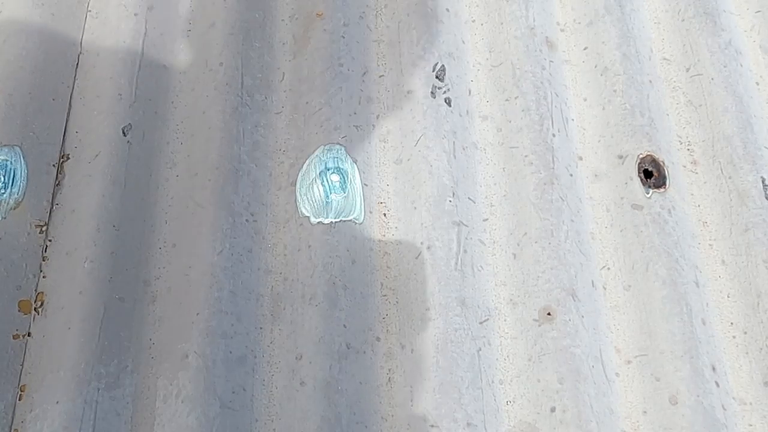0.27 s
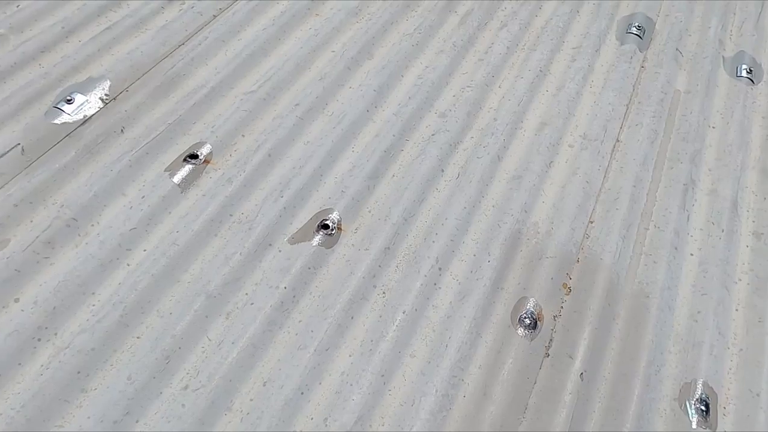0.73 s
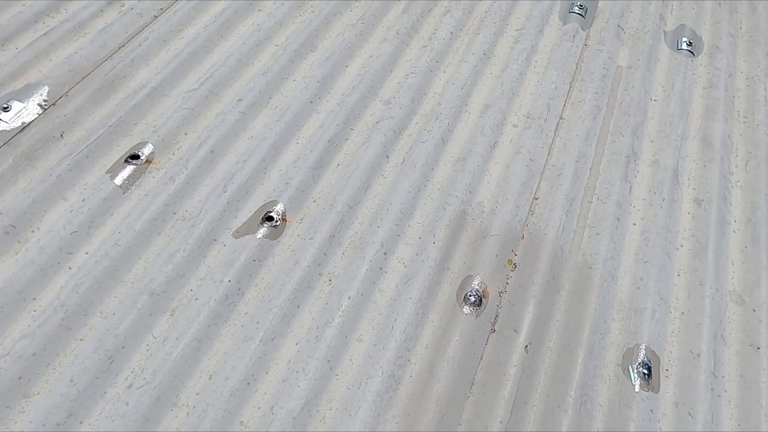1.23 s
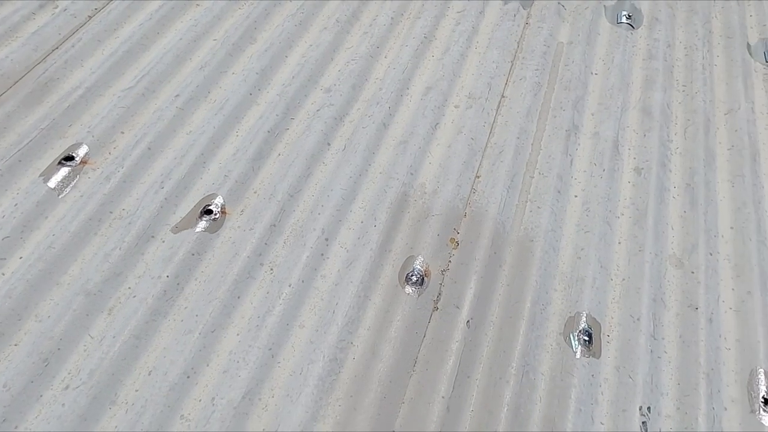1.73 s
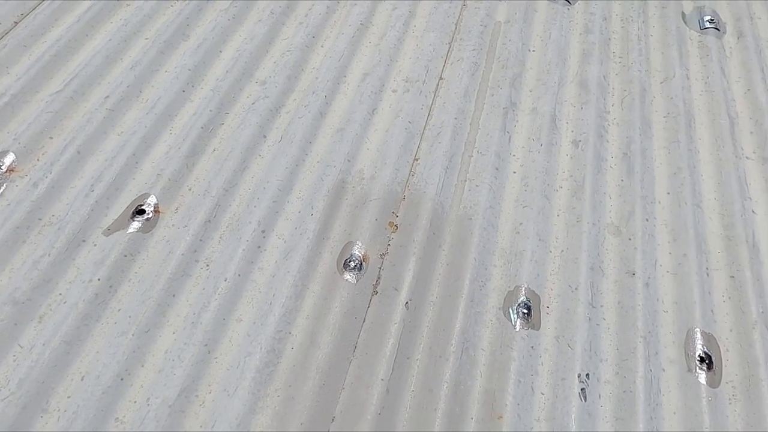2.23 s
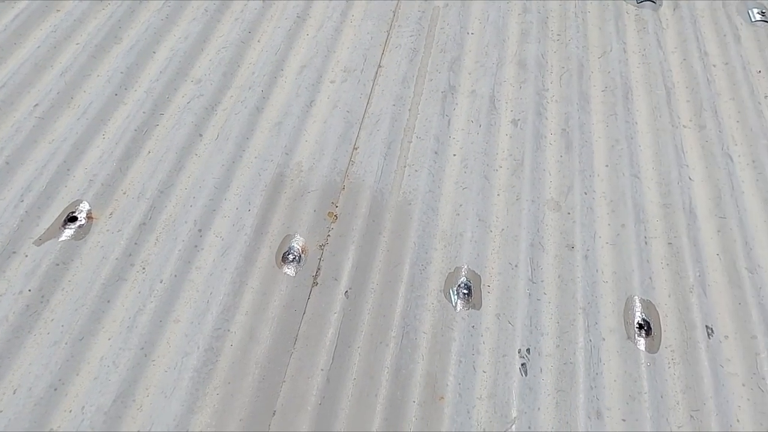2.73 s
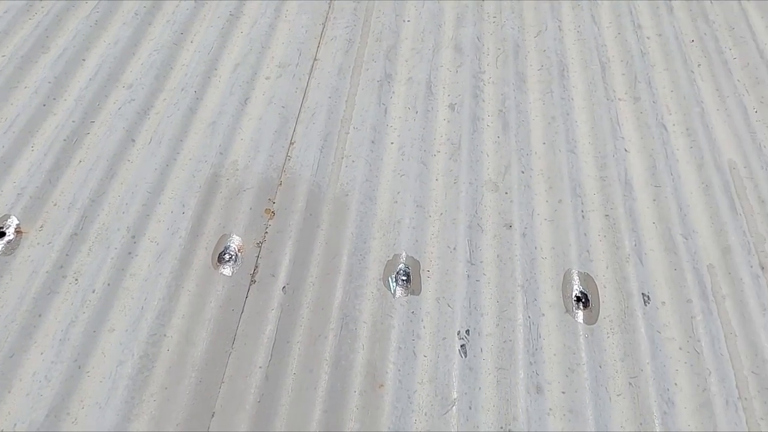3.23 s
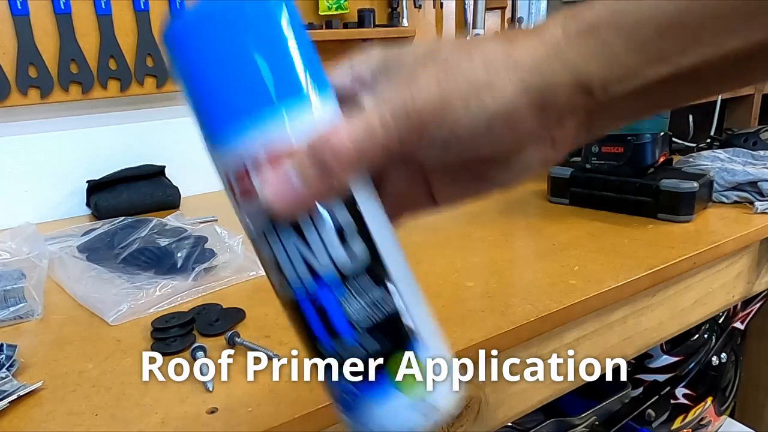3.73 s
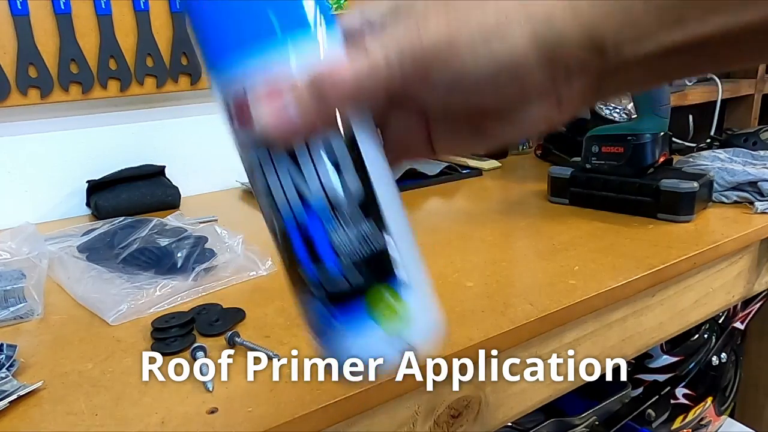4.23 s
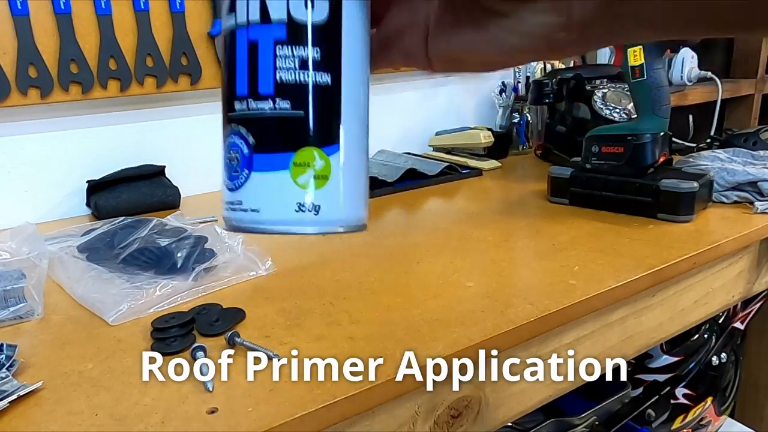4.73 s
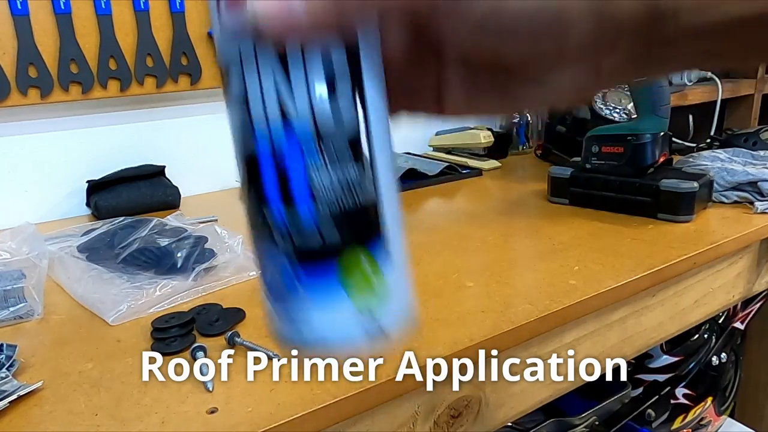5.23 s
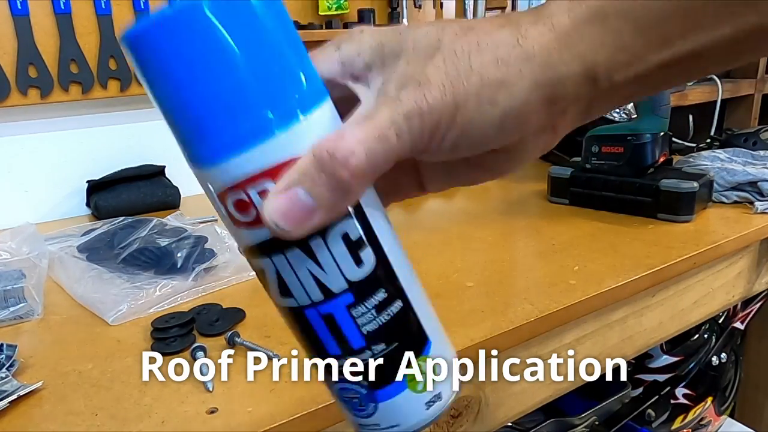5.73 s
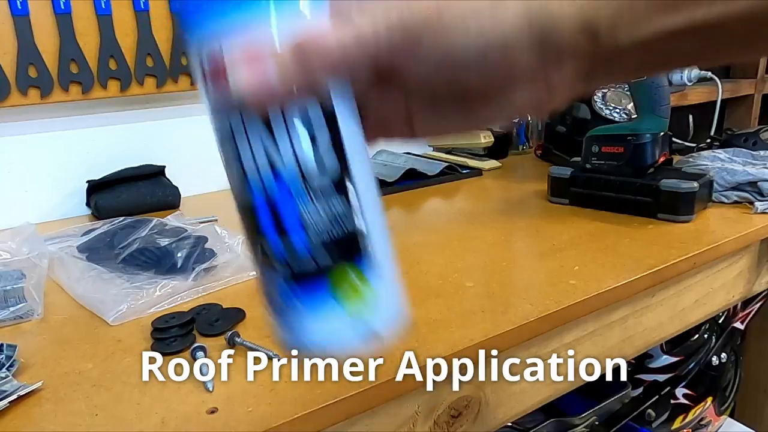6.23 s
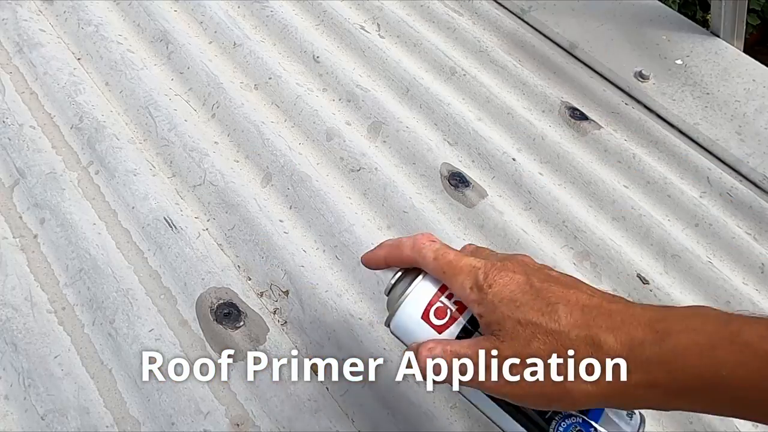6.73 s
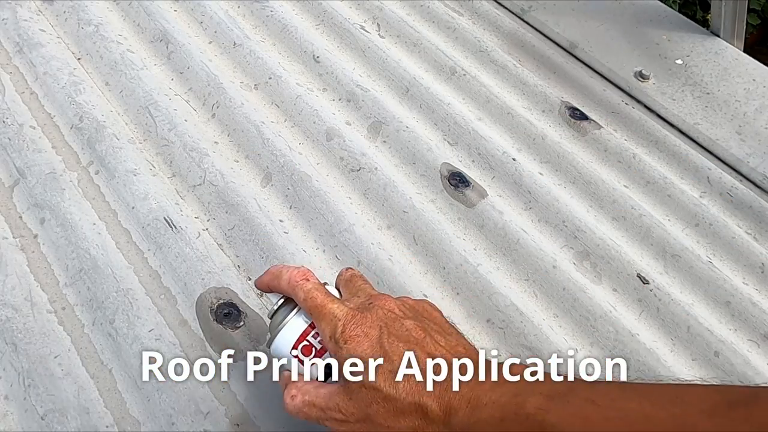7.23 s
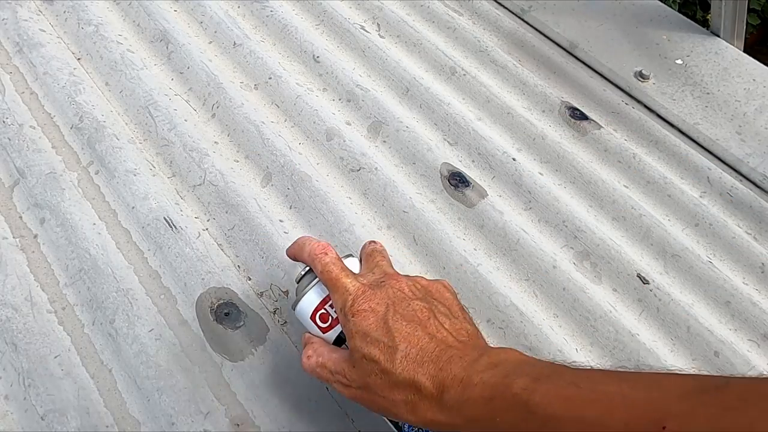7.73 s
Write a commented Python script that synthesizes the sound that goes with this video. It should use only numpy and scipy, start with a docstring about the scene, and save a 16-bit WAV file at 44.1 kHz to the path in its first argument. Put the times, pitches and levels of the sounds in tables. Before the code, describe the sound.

Outdoors on a metal roof, soft wind rumble, low hums and one thin falling bird call give way to a distant vehicle slowly growing louder. An abrupt cut to a quiet workshop: a spray can is shaken vigorously close to the microphone, its ball clacking brightly at one end and more dully at the other. Back outside, gentler irregular clicks, then two short hissing sprays.

```python
"""Spray can on a metal roof

Outdoors on a metal roof: wind on the microphone, a hum, a bird, a distant motor vehicle drawing nearer.
Then, in a workshop, a spray can is shaken: its mixing ball rolls along the wall and strikes dome and base.
Back on the roof the ball clicks more gently, and two short bursts of paint hiss through the nozzle.
Blows are shaped noise and ringing modes, air and spray are coloured noise, hums and engine are sines."""
import sys
import numpy as np
from scipy import signal
from scipy.fft import rfft, irfft, next_fast_len
from scipy.io import wavfile
from scipy.ndimage import map_coordinates

SR = 44100
rng = np.random.default_rng(int(sys.argv[2]) if len(sys.argv) > 2 else 0)


def dump(signal):
    """Clip the signal to [-1, 1] and save it as 16-bit WAV at the path in sys.argv[1]."""
    limited = np.clip(np.atleast_2d(signal).T, -1, 1)
    pcm = np.round(limited * 32767).astype(np.int16)
    wavfile.write(sys.argv[1], SR, pcm)


N = 351741
TIME = np.arange(N) / SR
INDOORS_FROM, INDOORS_TO = 3.431, 6.42  # seconds
CAN_LOWEST_HZ = 330


def shaken_can():
    """Hard shaking indoors; so small a body radiates hardly any bass."""
    can = dome_blows() + base_blows() + wall_blows() + grazes() + base_ring() + roll_up() + roll_down()
    can = signal.sosfilt(signal.butter(2, CAN_LOWEST_HZ, "high", fs=SR, output="sos"), can)
    fade_out = np.clip((INDOORS_TO + .04 - TIME) / .04, 0, 1)
    indoors = (TIME >= INDOORS_FROM) * fade_out
    return workshop(can + paint(), wet_db=-43.5) * indoors


# ringing of the steel shell, damped by paint and hand: (frequency [Hz], level [dB], t60 [s])
SHELL_MODES = [(1103, -7, 0.13), (2190, -12.5, 0.032), (2227, -7, 0.083), (3530, -14, 0.0765),
               (3870, -26, 0.058), (4730, -26, 0.039), (4700, -25.5, .05), (5180, -6.5, 0.078)]
# ball reaching the dome, sometimes rebounding: (time [s], level [dB], brightness [dB], main resonance [Hz])
DOME_HITS = [(3.4998, -17.5, 6.5, 1070), (3.6044, -15, 27, 1130.0), (3.8209, -17, 15, 1080),
             (3.8228, -18, 18, 4130), (4.015, -13, 16.5, 5250), (4.2378, -14, 16.5, 1070),
             (4.4481, -14.5, 9.5, 5250), (4.6617, -13.5, 19.5, 1100.0), (4.8983, -13, 16.5, 5530),
             (5.1171, -16, 18, 1080), (5.1192, -17, 16, 5340), (5.35, -15, 12.5, 1280),
             (5.6752, -16, 16, 2170), (5.8123, -15.0, 13, 5300), (6.043, -17.5, 23, 3240),
             (6.2573, -14.5, 14, 5600)]


def dome_blows():
    """The ball strikes the bare steel of the dome once a shake."""
    return blows(DOME_HITS, SHELL_MODES, chatter=.12, chatter_s=.0012, shell_db=-4,
                 splash_db=-31, splash_s=.01)


# ball landing on the base, cushioned by paint:
# (time [s], level [dB], brightness [dB], main resonance [Hz], base ring [dB])
BASE_HITS = [(3.7039, -19.5, -13, 2300, -25), (3.709, -18.5, 18, 2350, -25),
             (3.9183, -19, -1.5, 2130.0, -27), (3.9245, -20.5, -3, 5700, -27.5),
             (4.1165, -18.5, 6.5, 1940, -36), (4.1401, -20.5, 2, 2130.0, -27.5),
             (4.3349, -18, 10.5, 1090, -25.5), (4.3472, -20, 5.5, 2430, -23.5),
             (4.5468, -16, -2.5, 1110, -26), (4.7756, -15.5, -4, 3840, -22), (4.985, -22.5, -2, 1090, -27),
             (4.9944, -17.5, 3, 2930, -17), (5.2236, -18.0, -4.5, 3160, -21), (5.4376, -18, 4, 1090, -21.5),
             (5.468, -20.5, 9, 2170, -28.5), (5.7451, -21, -8, 1810, -40), (5.8953, -17, 0, 2160, -34.5),
             (5.9184, -19.5, -1.5, 3800, -24), (6.1188, -17.5, -9, 2050, -30),
             (6.133, -20.5, -6, 2170, -32), (6.3426, -16, 5.5, 2220, -47), (6.3734, -19.5, 1, 3460, -34)]


def base_blows():
    """The ball lands on the base, where a cushion of paint dulls many of the blows."""
    return blows(BASE_HITS, SHELL_MODES, chatter=0.29, chatter_s=0.0012, shell_db=-2.5,
                 splash_db=-27.5, splash_s=0.02)


# ringing of the domed base: (frequency [Hz], level [dB], t60 [s])
BASE_MODES = [(440, -23, .08), (640, -17, .07), (1040, -9, .06), (1110, 0, .063), (1190, -8, .045),
              (2270, -10, .08), (2350, -12, .07)]


def base_ring():
    """The domed base rings on in its own modes after each landing."""
    return ring_out(BASE_HITS, BASE_MODES)


# louder knocks on the wall: (time [s], level [dB], brightness [dB], main resonance [Hz])
WALL_HITS = [(3.4378, -27.5, -0.5, 3170), (3.4462, -26.5, -2.5, 1940), (3.4624, -27.5, -7, 1710.0),
             (3.5188, -19, -5, 4700), (3.5759, -30.5, -9, 3410.0), (3.5869, -23, -14, 3500.0),
             (3.6219, -20, 15, 1100.0), (3.6488, -33, -13, 4750.0), (3.6758, -33, -11, 5160.0),
             (3.7506, -33, -1, 1180), (3.8101, -26.5, 4, 3750), (3.8754, -28.5, -4, 1620.0),
             (3.8997, -34.5, -14, 3140.0), (3.947, -26.5, -4, 2100), (3.9756, -23.5, -9, 1560),
             (4.055, -19, 18, 5700), (4.0698, -27.5, -8.0, 5600.0), (4.0851, -29, -11, 5600.0),
             (4.0936, -30, -9.5, 1760.0), (4.1559, -28.5, -17, 4130.0), (4.2141, -29, -8, 3340),
             (4.2439, -25.5, 10, 1110), (4.2685, -18, 14.5, 5360), (4.303, -29.5, -4, 1790),
             (4.4675, -19, 6.5, 3140.0), (4.5118, -21.5, -0.5, 1830), (4.5644, -26.5, -1, 1130.0),
             (4.6004, -32, -10.5, 1450.0), (4.6866, -17, 10.0, 5750), (4.7068, -28, -5, 5630),
             (4.7388, -23.5, -2, 2020.0), (4.8042, -31, -30, 3910.0), (4.8253, -23.5, -10, 2140),
             (4.8556, -30.5, -17, 4250.0), (4.9269, -20.5, 8, 3230.0), (4.9548, -29, 2, 1770),
             (5.0366, -25, -10, 2500), (5.0695, -29.5, -10.5, 2430), (5.089, -41, -13.5, 700),
             (5.1642, -30, -1, 1980), (5.171, -37.5, -9, 1700), (5.2711, -27.5, -12.5, 4490.0),
             (5.3239, -28.5, -15, 1640), (5.3973, -26.5, -6, 3230.0), (5.4254, -26, -8, 2070.0),
             (5.5085, -23.5, -8, 1910.0), (5.5329, -30, -5, 2020.0), (5.5477, -34, -15, 2070.0),
             (5.5619, -32.5, -19, 1490.0), (5.5983, -29.5, -16, 4020.0), (5.69, -26, -5.0, 3600.0),
             (5.6906, -19, -5, 3600.0), (5.7248, -24, -6, 1720), (5.782, -29.5, -7, 3230.0),
             (5.805, -31, -8, 1900), (5.8686, -22.5, -4.5, 1980), (5.9035, -26, -6, 1900),
             (5.9583, -28, -7, 1620.0), (5.9657, -21.5, -14, 3940), (5.9922, -26, -20, 4020.0),
             (6.0109, -30.5, -14, 1570.0), (6.0739, -31, -3, 5630), (6.097, -34, -8, 2100),
             (6.149, -25.5, -8, 3910.0), (6.1553, -24, -15, 1230.0), (6.1859, -25.5, -8, 1910.0),
             (6.2105, -32.5, -5.5, 3600.0), (6.229, -31.5, -11, 3910.0), (6.2378, -27.5, -7, 1450.0),
             (6.3049, -26, -2, 1600), (6.3631, -30, -12, 1460)]


def wall_blows():
    """The ball knocks against the side of the can between dome and base."""
    return blows(WALL_HITS, SHELL_MODES, chatter=.24, chatter_s=.0011, shell_db=-3,
                 splash_db=-33, splash_s=.01)


def grazes():
    """After landings and knocks the ball skips on and faintly grazes the wall."""
    tumbles = skips(BASE_HITS, soonest_s=0.0054, latest_s=0.036,
                    level_db=-35.5, bright_db=-10.5, spread_db=2.0)
    skitters = skips(WALL_HITS, soonest_s=.004, latest_s=.022, level_db=-42, bright_db=-8, spread_db=3)
    hits = [(*row, rng.uniform(1500, 3500)) for row in [*tumbles, *skitters]]
    return blows(hits, SHELL_MODES, chatter=.4, chatter_s=.002, shell_db=-4, splash_db=-28, splash_s=.01)


def skips(hits, soonest_s, latest_s, level_db, bright_db, spread_db):
    """One faint contact at a random moment after each knock: (time [s], level [dB], brightness [dB])."""
    delays = soonest_s + (latest_s - soonest_s) * rng.random(len(hits))
    times = np.array([row[0] for row in hits]) + delays
    strengths = [level_db, bright_db] + spread_db * rng.standard_normal((len(hits), 2))
    return np.column_stack([times, strengths])


# fast runs along the wall, mostly up to the dome: (arrival time [s], level [dB], whistle [Hz])
ROLLS = [(3.5, -21, 4600), (3.604, -21.5, 5400), (3.821, -26.5, 3950), (4.015, -18.5, 5000),
         (4.238, -27.5, 4970), (4.448, -24.5, 6160), (4.662, -22, 5480), (4.775, -24, 4000),
         (4.898, -15.5, 5140), (5.117, -19.5, 6000), (5.35, -22, 4800), (5.675, -25, 5000),
         (5.812, -29.5, 6250), (6.043, -23.5, 5800), (6.257, -31, 6070)]


def roll_up():
    """The ball zings along the wall, swelling until it arrives."""
    return rolling(ROLLS, swell_s=0.0096)


BASE_ROLL_DB = -18  # relative to the blow on the base


def roll_down():
    """A fainter zing leads into each landing on the base."""
    return rolling([(s, db + BASE_ROLL_DB, 6100) for s, db, *_ in BASE_HITS], swell_s=0.014)


# colour of a ball rolling at its usual pitch: (frequency [Hz], level [dB])
ROLL = [(500, -26), (2000, -17), (3100, -15), (3700, -2), (4500, -6), (5200, -3.5), (6700, -7), (7300, -23),
        (9000, -22), (10500, -45.5), (16000, -57.5)]
WHISTLE_DB, WHISTLE_WIDTH_HZ = 7, 380
ROLL_RISE_PER_S = 1.5  # the pitch of the roll climbs by this share of its final value


def rolling(arrivals, swell_s, size=2048):
    """The ball gathers speed along the wall and zings: the faster it runs, the higher the pitch."""
    out = np.zeros(N)
    before = np.arange(size)[::-1] / SR  # seconds left until arrival
    hz = np.fft.rfftfreq(size, 1 / SR)
    knots = np.linspace(0, SR / 2, 60)
    path = (before - ROLL_RISE_PER_S * before ** 2 / 2) * SR
    for s, db, pitch in arrivals:
        ripple_db = 4.5 * np.interp(hz, knots, rng.standard_normal(len(knots)))
        whistle_db = WHISTLE_DB * np.exp(-((hz - pitch) / WHISTLE_WIDTH_HZ) ** 2)
        colour = from_db(at_hz(ROLL, hz) + ripple_db + whistle_db)
        steady = rms_one(irfft(rfft(rng.standard_normal(size)) * colour))
        scrape = map_coordinates(steady, [path], mode="mirror")
        add(out, s - size / SR, from_db(db) * scrape * np.exp(-before / swell_s))
    # the ball judders over seams and paint
    judder_db = 2.5 * drift(350) - .7
    return out * from_db(judder_db)


# colour of a blow of neutral brightness: (frequency [Hz], level [dB])
BLOW = [(50, -39), (200, -21), (480, -20.5), (700, -7.5), (1000, 0), (1450, 0), (2100, 3), (2800, -0.5),
        (4400, 0), (5400, -8), (6500, -12), (8700, -18), (10900, -34.5), (12200, -25.5), (16000, -52.5)]
# each spot struck favours one resonance, which rings briefly
SPOT_DB, SPOT_OCTAVES, SPOT_RING_DB, SPOT_T60_S = 8, .25, -11, .019
# every blow reaches the crowded modes of the shell differently
UNEVEN_DB, MODE_SPACING_HZ = 3, 170


def blow_colour_db(hz, bright_db, spot_hz, spot_db):
    """Bare steel gives a bright blow, a cushion of paint a dull one; the spot struck adds its resonance."""
    treble = 1 / (1 + (2850 / (hz + 1)) ** 7) - 0.36 / (1 + (6400 / (hz + 1)) ** 12)
    spot = np.exp(-(np.log2((hz + 1) / spot_hz) / SPOT_OCTAVES) ** 2)
    crowd = np.arange(0, SR / 2, MODE_SPACING_HZ)
    uneven = np.interp(hz, crowd, rng.standard_normal(len(crowd)))
    return at_hz(BLOW, hz) + bright_db * treble + spot_db * spot + UNEVEN_DB * uneven


def blows(hits, shell, chatter, chatter_s, shell_db, splash_db, splash_s, spot_db=SPOT_DB, size=4096):
    """Each blow is a crack, a brief chatter of waves round the can and a splashy wash; the shell rings on."""
    out = np.zeros(N)
    t, hz = np.arange(size) / SR, np.fft.rfftfreq(size, 1 / SR)
    crack = int(.004 * SR)  # the stretch whose rms sets the level
    for s, db, bright_db, spot_hz, *_ in hits:
        colour_db = blow_colour_db(hz, bright_db, spot_hz, spot_db)
        # minimum phase: the colour rings only after the contact
        cepstrum = irfft(np.log(from_db(colour_db)))
        causal = np.exp(rfft(2 * cepstrum[:size // 2], size))
        grain, wash = rng.standard_normal((2, size))
        force = chatter * grain * np.exp(-t / chatter_s) * (1 - np.exp(-t / 0.00041))
        force[int(.0004 * SR)] += 1
        # the dense upper modes of the shell are strongest in the wash
        wash = rfft(wash * from_db(splash_db) * np.exp(-t / splash_s))
        wash = wash * from_db(4 / (1 + (6500 / (hz + 1)) ** 6))
        knock = irfft((rfft(force) + wash) * causal)
        add(out, s, from_db(db) * knock / np.sqrt(np.mean(knock[:crack] ** 2)))
        # the blow excites each mode as strongly as its colour allows
        modes = [(f, level + np.interp(f, hz, colour_db) - colour_db.max(), t60)
                 for f, level, t60 in [*shell, (spot_hz, SPOT_RING_DB, SPOT_T60_S)]]
        add(out, s, from_db(db + shell_db) * ring(modes, scatter_db=4, detune=.012))
    return out


def ring(modes, scatter_db, detune, size=8192):
    """Struck modes; each blow lands elsewhere, and the sloshing paint shifts their pitch."""
    t = np.arange(size) / SR
    hz, db, t60 = np.transpose(modes)[:, :, None]
    strength = from_db(db + scatter_db * rng.standard_normal(hz.shape)) * rng.choice([-1, 1], hz.shape)
    hz = hz * (1 + detune * rng.standard_normal(hz.shape))
    return np.sum(strength * from_db(-60 * t / t60) * np.sin(2 * np.pi * hz * t), axis=0)


def ring_out(rows, modes):
    """The part of the can that is struck rings like a small gong; a row ends with its ring level."""
    out = np.zeros(N)
    for s, *_, ring_db in rows:
        add(out, s, from_db(ring_db) * ring(modes, scatter_db=2, detune=.01))
    return out


# dull slaps of paint against the can: (time [s], level [dB], centre [Hz])
SLAPS = [(3.515, -45, 280), (3.648, -39, 165), (4.558, -43, 205), (4.704, -46, 160), (4.736, -44, 210),
         (5.226, -43.5, 270), (5.467, -50.5, 280), (5.866, -44, 220), (6.119, -41.5, 170)]
SLAP_ATTACK_S, SLAP_DECAY_S = .003, 0.01
# colour of paint sloshing after the ball lands on the base: (frequency [Hz], level [dB])
SLOSH = [(40, -11.5), (150, -1), (270, -2), (350, -3.5), (450, 2.5), (530, -9), (630, 7.5), (800, 2.5),
         (1500, -21), (6000, -79.5)]
SLOSH_DB, SLOSH_LAG_S, SLOSH_S = -57, .012, .035  # level after a landing as loud as the first


def paint(size=4096):
    """The liquid surges with every downstroke and now and then slaps the can with a dull thud."""
    first_db = BASE_HITS[0][1]
    surges = [(s + SLOSH_LAG_S, SLOSH_S, SLOSH_DB + db - first_db) for s, db, *_ in BASE_HITS]
    out = swells(surges) * noise(SLOSH)
    t = np.arange(size) / SR
    envelope = (1 - np.exp(-t / SLAP_ATTACK_S)) * np.exp(-t / SLAP_DECAY_S)
    for s, db, hz in SLAPS:
        band = signal.butter(2, [.7 * hz, 1.4 * hz], "band", fs=SR, output="sos")
        body = signal.sosfilt(band, rng.standard_normal(2 * size))[size:]  # past the filter's onset
        add(out, s, from_db(db) * rms_one(body) * envelope)
    return out


# workshop reverberation: (frequency [Hz], t60 [s])
ROOM_T60 = [(200, 0.56), (1000, 0.31), (4000, 0.23), (9000, 0.46), (16000, 0.27)]


def workshop(x, wet_db, size=16384, count=5):
    """A short diffuse tail that changes as the can swings through the room; wider in the treble."""
    t, hz = np.arange(size) / SR, np.fft.rfftfreq(size, 1 / SR)
    white = rfft(rng.standard_normal((count, 2, size)))
    response = 0
    edges = np.geomspace(100, SR / 2, 9)
    for low, high in zip(edges, edges[1:]):
        centre = np.sqrt(low * high)
        mid_db = at_hz([(8000, 0), (13000, 3)], centre)
        side_db = at_hz([(4000, -8), (8000, -3), (13000, 3)], centre)
        band = irfft(white * ((hz >= low) & (hz < high)))
        response = response + from_db([[mid_db], [side_db]]) * band * from_db(-60 * t / at_hz(ROOM_T60, centre))
    response = from_db(wet_db) * response * (t > .004)
    # the hand passes through a ring of positions, each with its own echoes
    place = TIME * 11 % count
    mid_side = 0
    for k in range(count):
        closeness = np.clip(1 - abs((place - k + 1) % count - 1), 0, 1)
        here = (x * np.sqrt(closeness))[None]
        mid_side = mid_side + signal.oaconvolve(here, response[k], axes=1)[:, :N]
    mid, side = mid_side
    return x + mid + side * np.array([[1], [-1]])


# left over right at the two microphone ports: (frequency [Hz], balance [dB])
PORT_BALANCE = [(100, 0), (6000, 0), (9000, -.6), (11000, -5), (13000, -6.5), (16000, -4)]
# lead of the left port: (frequency [Hz], phase [rad])
PORT_PHASE = [(100, 0), (10500, 0), (12200, -.8), (13600, -1.1), (16000, -.6)]


def ports(x):
    """The two microphone ports differ slightly in phase, and in level at the top."""
    size = next_fast_len(N)
    hz = np.fft.rfftfreq(size, 1 / SR)
    half = np.array([[.5], [-.5]])
    balance = from_db(half * at_hz(PORT_BALANCE, hz))
    lead = np.exp(1j * half * at_hz(PORT_PHASE, hz))
    return irfft(rfft(x, size) * balance * lead, size)[:, :N]


# louder clicks of the gently swirled can outdoors: (time [s], level [dB], brightness [dB], clink [dB])
SWIRL_HITS = [(6.4494, -19.5, 5.5, -26), (6.4577, -30, -3, -42), (6.4876, -36.5, -7, -36),
              (6.5066, -35, -9, -37), (6.5601, -21.5, 11, -24), (6.592, -28, -2, -41),
              (6.6187, -21, -9.5, -25), (6.6305, -23, -8, -45), (6.6675, -22, -1.5, -38),
              (6.6956, -31.5, -11, -45), (6.7115, -34, -7.5, -38), (6.7235, -45, -11, -46),
              (6.7761, -31.5, -7.5, -45), (6.7826, -21, 0, -41), (6.8272, -34.5, -15, -43),
              (6.8578, -23, -8, -16.5), (6.866, -40, -19, -37), (6.8846, -40, -22, -31),
              (6.9002, -31, -17.5, -17), (6.9347, -37, -17, -21.5), (7.03, -30, 9, -35),
              (7.0527, -38, -20, -30.5), (7.0915, -35, -20, -34), (7.1091, -38, -22, -45),
              (7.1215, -45, -17, -39), (7.1527, -30, 0.5, -40), (7.169, -45, -18, -41),
              (7.182, -52, -17, -42), (7.2183, -40, 0, -40), (7.2495, -21.5, 4, -42),
              (7.3162, -33, -14, -48), (7.3617, -31, -1, -53)]
# the shell in a firm grip: (frequency [Hz], level [dB], t60 [s])
GRIPPED_MODES = [(1000, -18, 0.027), (1610, -4, 0.015), (2340, 8, 0.02), (3600, -6, 0.016),
                 (4830, 9, 0.022), (8250, 12, 0.014)]
# clink of the wall in a firm grip: (frequency [Hz], level [dB], t60 [s])
CLINK_MODES = [(2027, 0, .015), (2240, -11, .035)]


def swirled_can():
    """The firmly held can gives short clicks and clinks; the ball rebounds at once and circles on."""
    rebounds = [(s + rng.uniform(.0015, .0035), db - 7, bright_db - 2, clink_db)
                for s, db, bright_db, clink_db in SWIRL_HITS]
    # hard clicks favour a high resonance, soft ones a low one
    hits = [(s, db, bright_db, np.interp(bright_db, [-10, 3], [1700, 6000]))
            for s, db, bright_db, _ in SWIRL_HITS + rebounds]
    clicks = blows(hits, GRIPPED_MODES, chatter=.25, chatter_s=.0011, shell_db=-11,
                   splash_db=-37, splash_s=.009, spot_db=4)
    clinks = ring_out(SWIRL_HITS, CLINK_MODES)
    return (clicks + clinks + circling_ball()) * from_db([[-.7], [.7]])


# loudness of the circling ball between clicks: (time [s], level [dB])
CIRCLING = [(6.42, -48), (6.47, -71), (6.54, -58), (6.6, -63), (6.73, -63), (6.8, -64), (6.98, -67),
            (7.09, -63), (7.2, -63), (7.29, -63), (7.42, -67)]
# its colour: (frequency [Hz], level [dB])
CIRCLING_COLOUR = [(500, -25), (1400, -8), (2020, -5), (2240, 7), (2520, -6), (3800, -6), (4800, -12),
                   (6500, -20), (9000, -20), (16000, -60)]


def circling_ball():
    """The ball circles in the can with a gritty whirr of coloured noise."""
    circling_db, = in_time(CIRCLING)
    grit_db = 3 * drift(90)
    return (TIME > INDOORS_TO) * from_db(circling_db + grit_db) * noise(CIRCLING_COLOUR)


# presses of the nozzle: (start time [s], end time [s])
SPRAY = [(7.41, 7.588), (7.852, 8.1)]
# colour of the jet: (frequency [Hz], level [dB])
JET = [(400, -21), (750, -4), (1050, 0), (1600, 0), (2100, -4), (2800, 0), (4400, -1), (6000, -7),
       (7500, -5.5), (8400, -9.5), (9600, -15), (12500, -13), (15000, -24), (16000, -45)]
# whistling resonances of the nozzle: (frequency [Hz], width [Hz], lift [dB])
NOZZLE = [(1030, 170, 6), (2830, 160, 1), (3330, 220, 2), (4200, 300, 7), (5200, 450, 5), (8600, 1000, 6)]
SPRAY_DB, VALVE_OPENS_S, VALVE_SHUTS_S = -39, 0.031, 0.011


def spray():
    """While the valve is open, propellant hisses unevenly through the resonant nozzle."""
    valve = 0
    for start, end in SPRAY:
        opening = np.clip((TIME - start) / VALVE_OPENS_S, 0, 1)
        valve = valve + opening * np.exp(-np.maximum(TIME - end, 0) / VALVE_SHUTS_S)
    hz = np.geomspace(100, SR / 2, 400)
    lift_db = sum(db / (1 + (2 * (hz - f) / width) ** 2) for f, width, db in NOZZLE)
    hiss = wide_noise(np.column_stack([hz, at_hz(JET, hz) + lift_db]), side_db=-16.0)
    flutter_db = 1.4 * drift(110) + 1.8 * drift(400)
    return valve * from_db(SPRAY_DB + flutter_db) * hiss * from_db([[-1.5], [1.5]])


# nearness of the far vehicle, as the level of its tyres: (time [s], level [dB])
TRAFFIC = [(0.8, -43), (1.39, -44), (2.46, -37.5), (3.15, -35.5), (3.38, -34.5)]
# colour of its tyres: (frequency [Hz], level [dB])
TYRES = [(260, -28), (450, -4), (534, -6.5), (617, 0.5), (762, -11.5), (929, -2.5), (1070, -7),
         (1310, -6.5), (1450, -7), (1750, -7.5), (1850, -10.5), (2430, -18), (4820, -27.5), (7500, -42),
         (9200, -42.5), (10500, -63), (13600, -94)]
TRAFFIC_FROM = .68  # seconds
RUMBLE_OVER_TYRES_DB = 5


def approaching_vehicle():
    """Tyres, rumble and engine grow together, off to the right, in a light breeze."""
    tyres_db, = in_time(TRAFFIC)
    nearness_db = tyres_db - np.mean([db for _, db in TRAFFIC])
    air = open_air(TYRES, breeze_db=-46.5, rumble_db=tyres_db + RUMBLE_OVER_TYRES_DB, tyres_db=tyres_db,
                   wind_side_db=-14.5, tyres_side_db=-14.5)
    return from_right(air + engine(nearness_db, waver=0.00945, flutter_db=2.5), lag_s=.000058)


# tones of the distant engine: (multiple of the firing rate, level [dB])
ENGINE_ORDERS = [(1, 1.5), (1.43, -1), (2, 1), (3, 3), (4, -5), (6, -11.5), (9, -12)]
# it sags to a steady firing rate and grows louder with the tyres, by a share of their rise
ENGINE_START_HZ, SAG_HZ_PER_S, ENGINE_CRUISE_HZ = 111.63, 10, 101.54
ENGINE_DB, ENGINE_FOLLOWS = -41.5, 0.45


def engine(nearness_db, waver, flutter_db):
    """Firing orders of a far engine, each fading in and out on its way through the air."""
    hz = np.maximum(ENGINE_START_HZ - SAG_HZ_PER_S * (TIME - TRAFFIC_FROM), ENGINE_CRUISE_HZ)
    level_db = ENGINE_DB + ENGINE_FOLLOWS * nearness_db
    phase = 2 * np.pi * np.cumsum(hz * (1 + waver * drift(8.87))) / SR
    return sum(from_db(level_db + db + flutter_db * drift(7.9)) * np.sin(k * phase)
               for k, db in ENGINE_ORDERS)


# swells of one falling bird call: (time [s], length [s], level [dB])
BIRD = [(.74, 0.018, -54), (.775, .008, -55), (.805, 0.02, -50.5), (.84, .04, -62)]
BIRD_FROM, BIRD_START_HZ, BIRD_END_HZ, BIRD_GLIDE_S = .72, 5240, 4060, 0.033


def bird(warble):
    """One thin, falling call, hoarse and broken."""
    fall = np.exp(-np.maximum(TIME - BIRD_FROM, 0) / BIRD_GLIDE_S)
    hz = BIRD_END_HZ + (BIRD_START_HZ - BIRD_END_HZ) * fall
    phase = 2 * np.pi * np.cumsum(hz * (1 + warble * drift(118))) / SR
    hoarse = drift(260) * np.sin(phase) + drift(260) * np.cos(phase)
    return swells(BIRD) * .7 * hoarse


# soft rustles: (time [s], length [s], level [dB], strongest [Hz])
RUSTLES = [(0.04, 0.14, -53.5, 13000), (0.176, 0.02, -50, 6700), (0.609, 0.015, -59.5, 6000),
           (0.622, 0.0051, -54.5, 4000)]
# their common colour: (frequency [Hz], level [dB])
RUSTLE = [(1000, 8), (3500, 0), (7000, -10), (10000, -13), (13000, -30), (16000, -19.5)]
RUSTLE_LIFT_DB, RUSTLE_OCTAVES = 11, 0.49


def rustles():
    """Soft, high swishes close by, each lifted round its own pitch."""
    hz = np.geomspace(100, SR / 2, 60)
    out = 0
    for s, length, db, centre in RUSTLES:
        lift_db = RUSTLE_LIFT_DB * np.exp(-(np.log2(hz / centre) / RUSTLE_OCTAVES) ** 2)
        swish = wide_noise(np.column_stack([hz, at_hz(RUSTLE, hz) + lift_db]), side_db=-9.0)
        out = out + swells([(s, length, db)]) * swish
    return out


# low drones: (start time [s], end time [s], pitch [Hz], level [dB])
DRONES = [(-.1, 0.79, 57.3, -29.5), (-.1, 0.58, 174, -37), (-.1, .65, 226, -43), (.15, 0.56, 398.5, -46.5),
          (.66, 1.07, 94.6, -31)]


def drones(waver):
    """Low wavering hums that come and go."""
    out = np.zeros(N)
    for start, end, hz, db in DRONES:
        gate = np.clip(np.minimum(TIME - start, end - TIME) / 0.13, 0, 1)
        level = from_db(db + 1.2 * drift(3))
        phase = 2 * np.pi * np.cumsum(hz * (1 + waver * drift(3))) / SR
        out += gate * level * np.sin(phase)
    return out


# far hush before the vehicle comes: (frequency [Hz], level [dB])
HUSH = [(260, -26), (450, -11), (700, -19.5), (1000, -17), (1500, -19.5), (2400, -23.5), (3800, -38.5),
        (7200, -46.5), (12000, -70), (16000, -100)]


def calm_roof():
    """Breeze and a far hush that slowly fades."""
    return open_air(HUSH, breeze_db=-39.5, rumble_db=-39.5, tyres_db=-49.0 - 4.5 * TIME,
                    wind_side_db=-8.0, tyres_side_db=-3)


# darker hush round the spraying: (frequency [Hz], level [dB])
LATE_HUSH = [(260, -30), (450, -6), (600, -9.5), (880, -6.5), (1500, -15.5), (3000, -41), (6000, -55),
             (9200, -58), (11000, -78), (16000, -100)]
TYRES_EBB_DB_PER_S, RUMBLE_GROWS_DB_PER_S = 1.5, 2


def late_roof(back_s):
    """Back on the roof the tyre noise of the road ebbs while its rumble grows."""
    return open_air(LATE_HUSH, breeze_db=-38.0, rumble_db=-49.5 + RUMBLE_GROWS_DB_PER_S * back_s,
                    tyres_db=-53.5 - TYRES_EBB_DB_PER_S * back_s, wind_side_db=-3.0, tyres_side_db=-8.0)


# colour of wind on the microphone: (frequency [Hz], level [dB])
WIND = [(12, -2), (30, 2), (55, 4.5), (90, -5), (150, -9.5), (300, -24.5), (800, -64), (4000, -120)]
# gusts over the steady breeze: (time [s], length [s], level [dB])
GUSTS = [(.03, 0.1, -30.5), (.6, 0.082, -34.5), (6.55, 0.038, -37), (7.63, 0.1, -30.5),
         (7.92, 0.038, -32.5)]
# colour of road rumble: (frequency [Hz], level [dB])
RUMBLE = [(50, 0), (100, -8), (150, 0), (220, -2.5), (320, -5), (450, -10), (650, -17.5), (1000, -18.5),
          (2500, -83), (6000, -120)]


def open_air(tyres, breeze_db, rumble_db, tyres_db, wind_side_db, tyres_side_db):
    """Lumpy wind on the microphone over the rumble and tyre noise of a road."""
    lumps_db, surges_db = 1.4 * drift(9), 1.0 * drift(14)
    wind_level = np.hypot(from_db(breeze_db), swells(GUSTS)) * from_db(lumps_db)
    wind = wind_level * wide_noise(WIND, side_db=wind_side_db)
    rumble = from_db(rumble_db + surges_db) * wide_noise(RUMBLE, side_db=-23.5)
    return wind + rumble + from_db(tyres_db) * wide_noise(tyres, side_db=tyres_side_db)


# quiet air of the workshop: (frequency [Hz], level [dB])
ROOM_TONE = [(15, -9.5), (35, -9.5), (50, 3.5), (70, -9), (150, -14.5), (400, -16.5), (1500, -16),
             (8000, -38), (16000, -46)]


def room_tone():
    """Quiet, steady workshop air as coloured noise."""
    return from_db(-55) * wide_noise(ROOM_TONE, side_db=-20)


def from_right(x, lag_s):
    """Sound from the right reaches the left port a little later, by at most a quarter cycle."""
    size = next_fast_len(N)
    angle = np.minimum(2 * np.pi * np.fft.rfftfreq(size, 1 / SR) * lag_s, np.pi / 2)
    left = irfft(rfft(x[0], size) * np.exp(-1j * angle), size)[:N]
    return np.array([left, x[1]])


def from_db(db):
    """Decibels to gain."""
    return 10 ** (np.asarray(db) / 20)


def rms_one(x):
    """Scale to unit power."""
    return x / np.sqrt(np.mean(x ** 2) + 1e-20)


def in_time(rows):
    """Each column of a curve at every sample."""
    s, *columns = np.transpose(rows)
    return [np.interp(TIME, s, c) for c in columns]


def at_hz(points, hz):
    """Read a spectrum on a log-frequency axis."""
    f, value = np.transpose(points)
    return np.interp(np.log(np.maximum(hz, 1)), np.log(f), value)


def add(out, s, sound):
    """Mix a short sound in at time s."""
    i = max(int(s * SR), 0)
    out[i:i + len(sound)] += sound[:N - i]


def swells(rows):
    """Gain that rises and falls in a bell round each row."""
    return sum(from_db(db) * np.exp(-((TIME - s) / length) ** 2) for s, length, db in rows)


def noise(spectrum):
    """Noise of a given colour, rms 1."""
    size = next_fast_len(N)
    colour = from_db(at_hz(spectrum, np.fft.rfftfreq(size, 1 / SR)))
    return rms_one(irfft(rfft(rng.standard_normal(size)) * colour, size)[:N])


def wide_noise(spectrum, side_db):
    """Stereo noise: a shared part and an opposed one at side_db below or above it."""
    return noise(spectrum) + from_db(side_db) * noise(spectrum) * np.array([[1], [-1]])


def drift(rate):
    """Random wander of spread 1, smoothed above rate [Hz], computed at every 40th sample."""
    r = np.exp(-80 * np.pi * rate / SR)
    slow = signal.lfilter([1], [1, -2 * r, r * r], rng.standard_normal(N // 40 + 2002))[2000:]
    return np.interp(np.arange(N) / 40, np.arange(len(slow)), rms_one(slow))


def scene():
    """Roof, workshop, roof again."""
    early = TIME < INDOORS_FROM
    traffic = np.clip((TIME - TRAFFIC_FROM) / .01, 0, 1)
    back_s = np.maximum(TIME - INDOORS_TO, 0)
    late = np.minimum(back_s / 0.11, 1)
    can = ports(shaken_can()) + from_right(swirled_can(), lag_s=.000034)
    can = can + from_right(spray(), lag_s=.000012)
    roof = (1 - traffic) * calm_roof() + traffic * approaching_vehicle()
    roof = roof + bird(warble=0.0366) + rustles() + drones(waver=0.013)
    return early * roof + ~early * (1 - late) * room_tone() + late * late_roof(back_s) + can


CUTOFF_HZ = 15400


def record(dry):
    """The highest peaks are rounded and the top is cut."""
    rounded = 1.5 * np.tanh(dry / 1.5)
    return signal.sosfilt(signal.ellip(10, .1, 90, CUTOFF_HZ, fs=SR, output="sos"), rounded)


dry = scene()
out = record(dry)
dump(out)
```